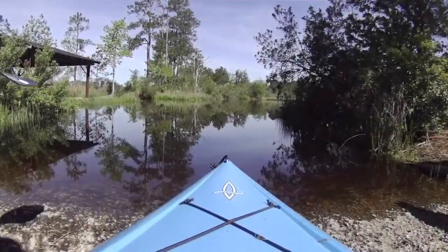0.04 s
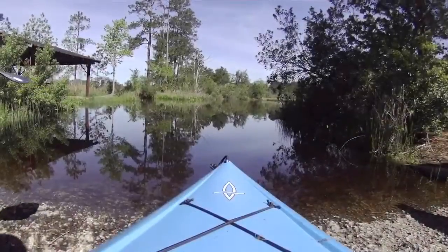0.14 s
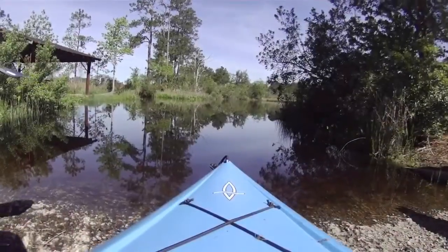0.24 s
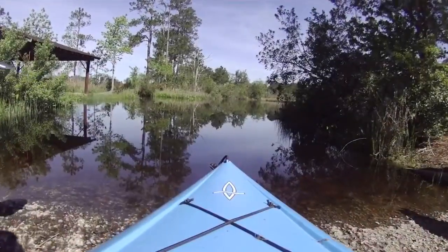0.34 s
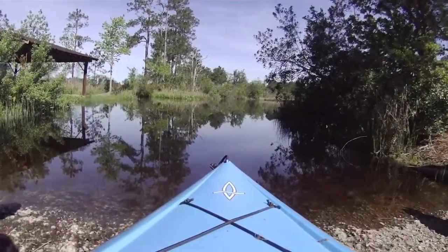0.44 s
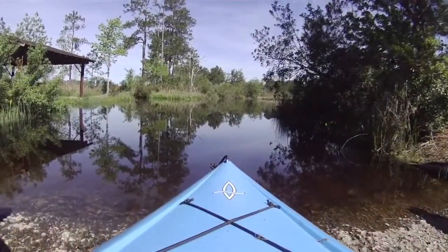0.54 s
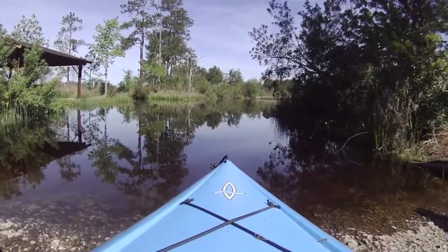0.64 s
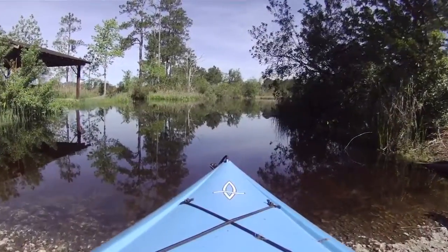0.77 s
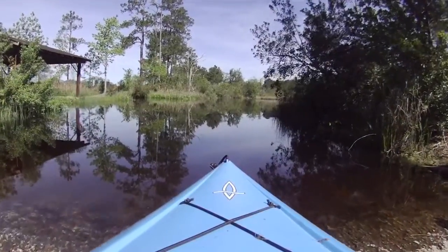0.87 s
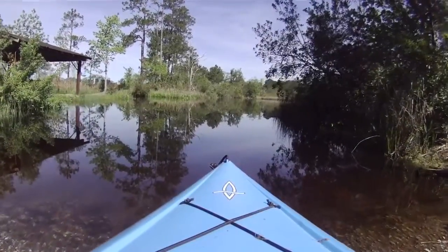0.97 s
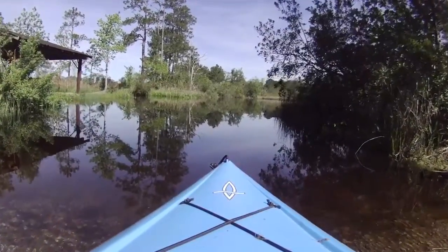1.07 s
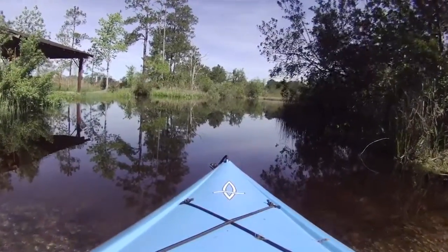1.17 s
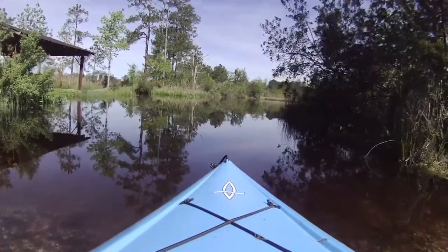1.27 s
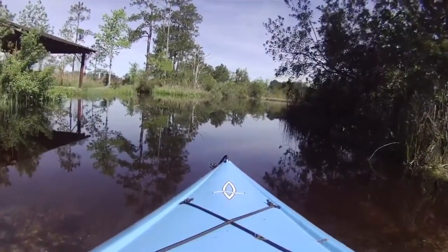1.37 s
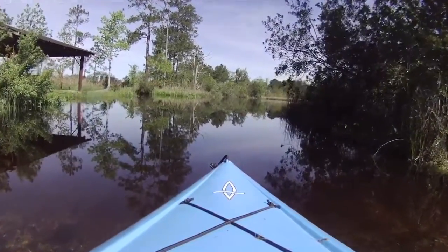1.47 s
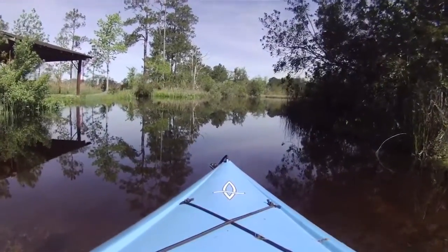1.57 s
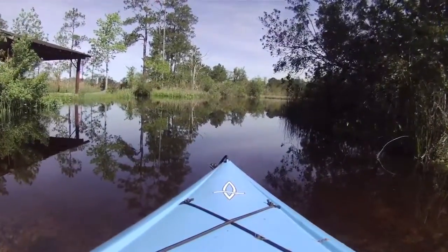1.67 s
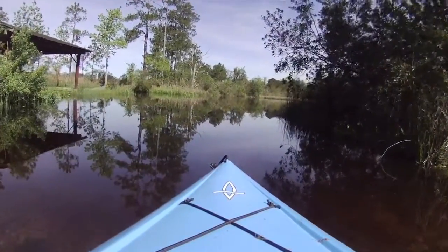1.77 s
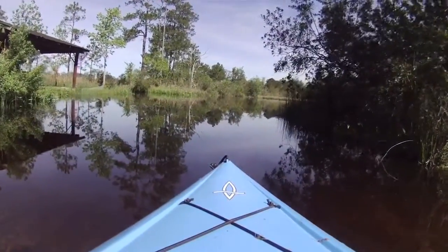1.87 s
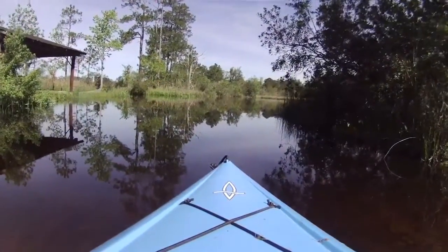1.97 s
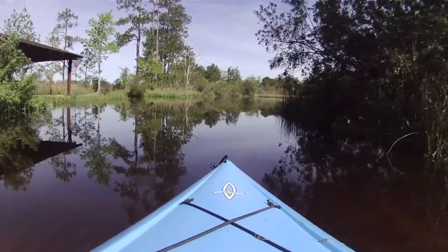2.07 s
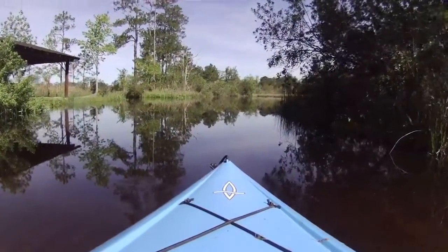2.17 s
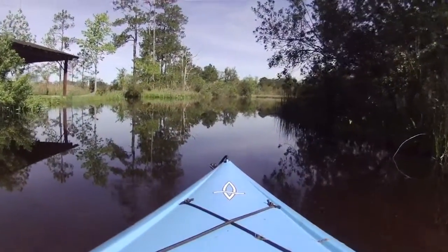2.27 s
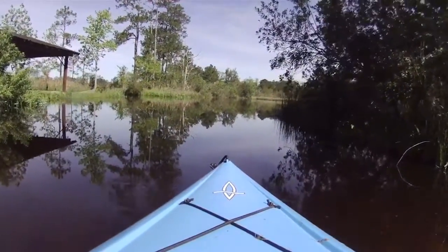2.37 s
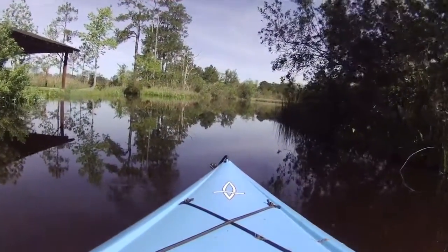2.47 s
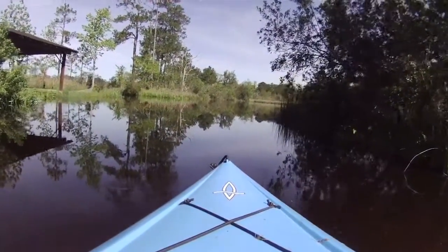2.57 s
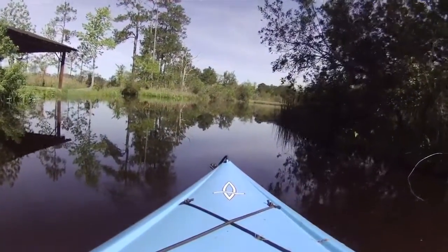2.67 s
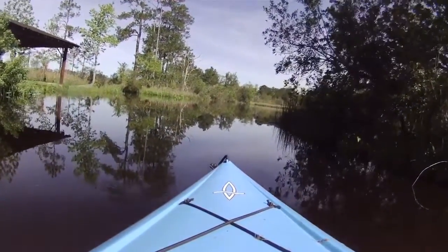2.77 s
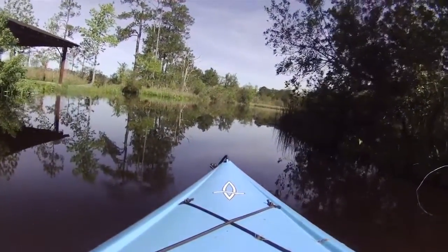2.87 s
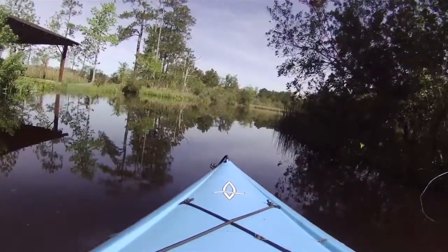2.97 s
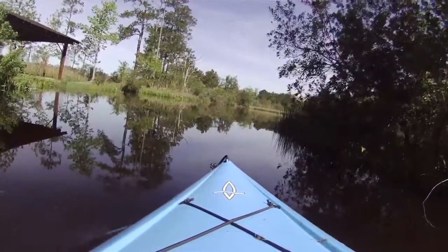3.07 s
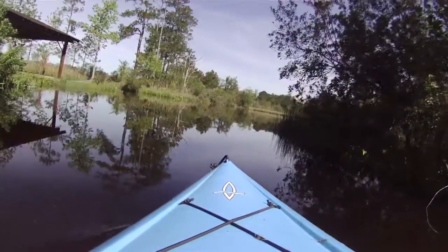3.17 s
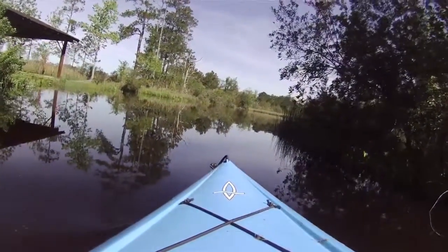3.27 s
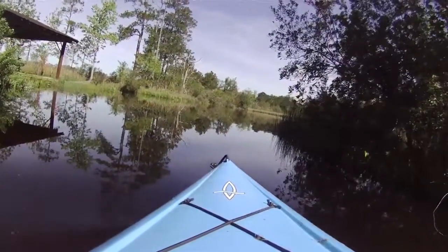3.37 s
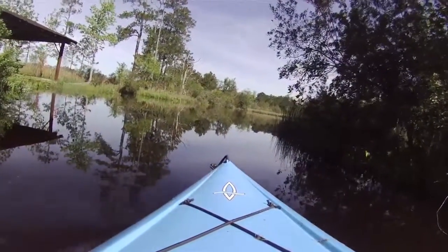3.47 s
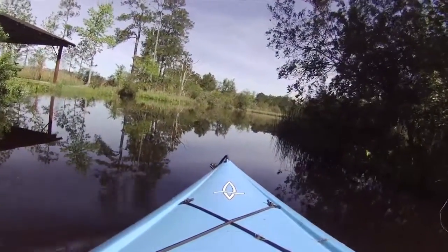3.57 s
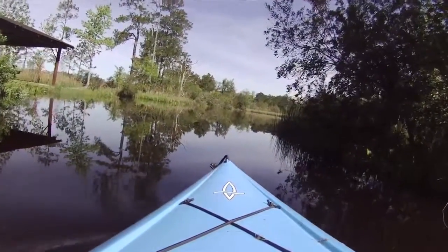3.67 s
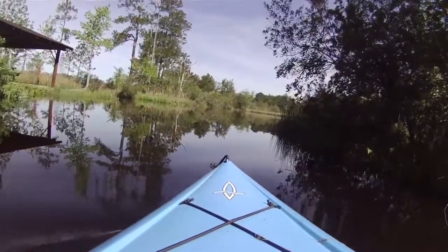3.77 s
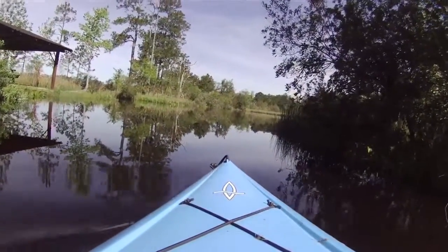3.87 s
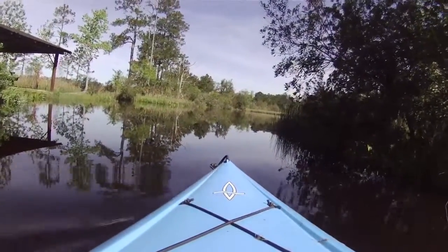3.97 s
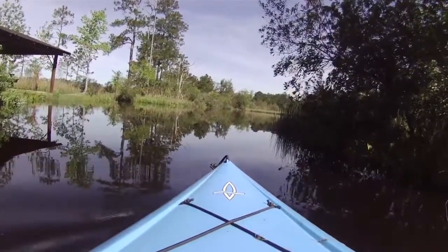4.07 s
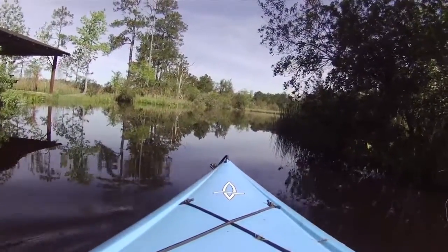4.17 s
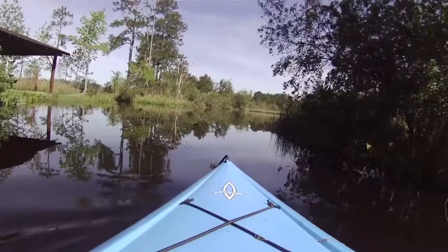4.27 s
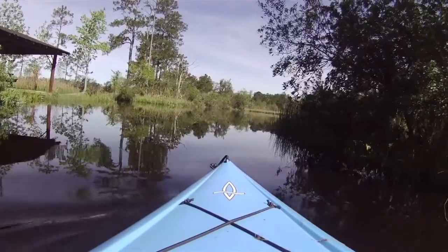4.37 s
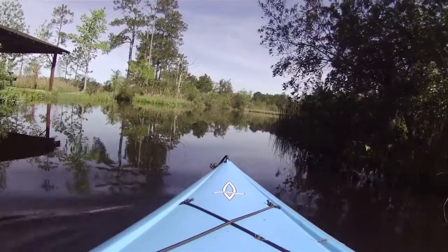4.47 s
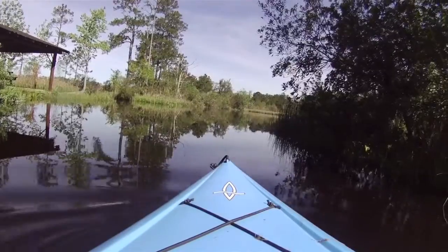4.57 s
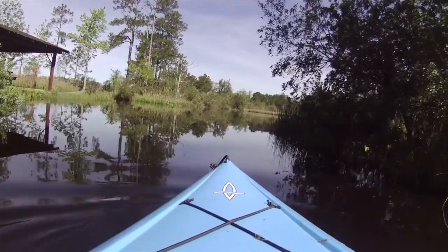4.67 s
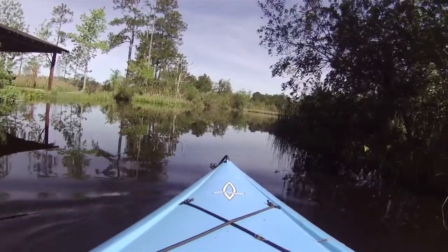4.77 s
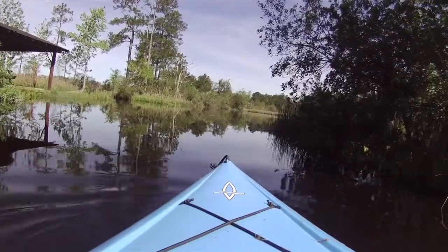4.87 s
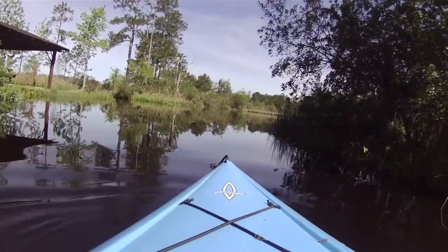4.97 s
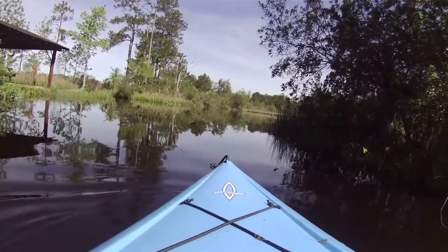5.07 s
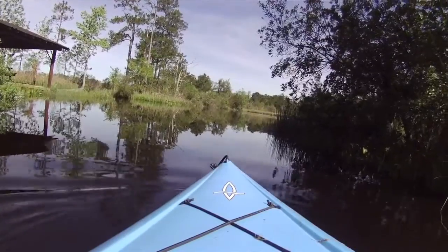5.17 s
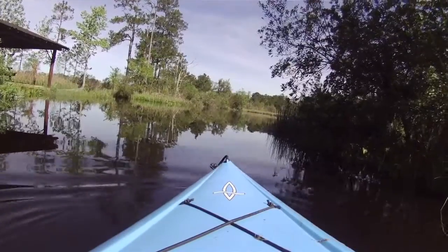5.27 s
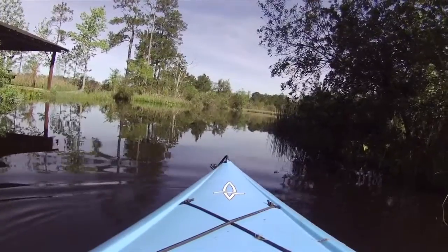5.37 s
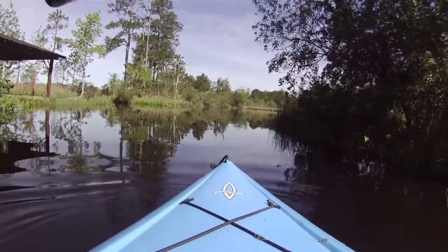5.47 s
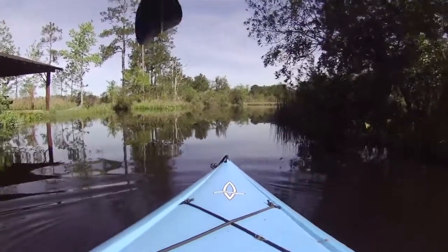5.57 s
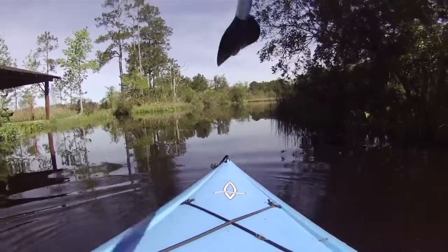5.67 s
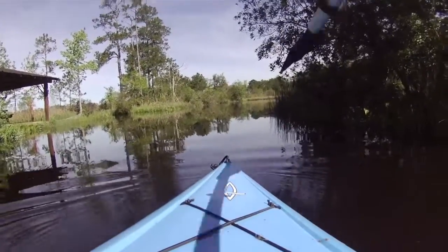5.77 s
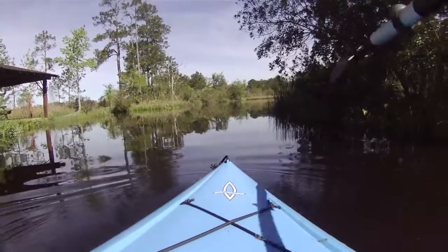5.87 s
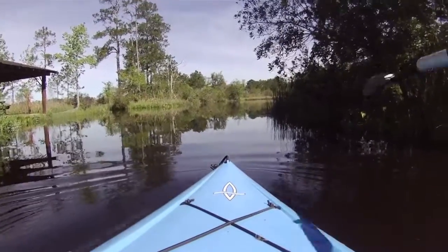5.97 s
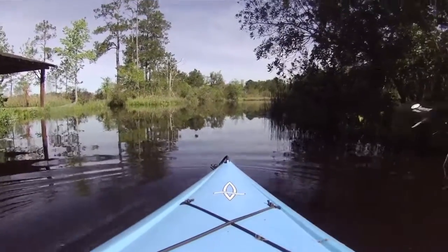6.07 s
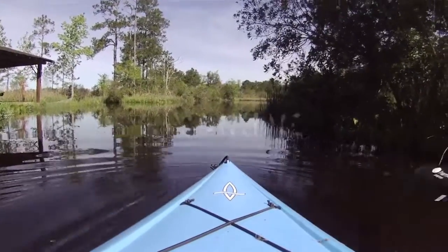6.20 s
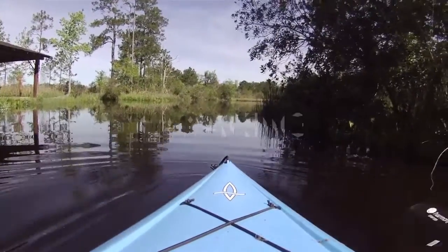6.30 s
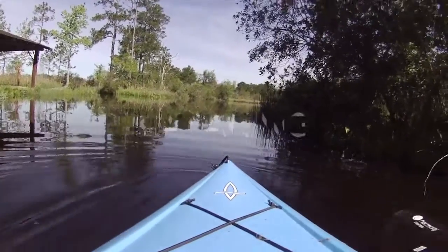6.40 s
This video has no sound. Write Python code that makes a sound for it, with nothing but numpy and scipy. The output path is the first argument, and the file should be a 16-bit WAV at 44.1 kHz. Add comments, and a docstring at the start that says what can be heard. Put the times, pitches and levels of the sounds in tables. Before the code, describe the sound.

Heard from on board, dry and close: a coarse, resonant grinding of pebbles and sand under a hollow plastic boat, full of irregular woody knocks, lasting about three and a half seconds in two shoves. It fades to quiet lapping as the boat floats free. Light drips and small bubbles follow, then a deep watery gulp, a dull bump, more droplets, a second gulp and a loud closing clack on the hull.

```python
"""A gravel bank on a calm creek: a plastic kayak is pushed off, and paddled once it floats free.
Random slips and grains drive the modes of the hollow hull, which booms, and shaped noise makes the crunch.
Larger stones knock at their own pitch. Afloat, the blades gulp (gliding tones), splash and drip (short
ringing tones with noise), small waves hum in the hull and the paddle shaft knocks on it.
Shaped noise laps and hisses underneath."""
import sys
import numpy as np
from scipy import signal
from scipy.fft import rfft, irfft, next_fast_len
from scipy.io import wavfile
from scipy.ndimage import uniform_filter1d, map_coordinates

SR = 44100
rng = np.random.default_rng(int(sys.argv[2]) if len(sys.argv) > 2 else 0)


def store_pcm(level_fs):
    """Save levels as 16-bit WAV."""
    pcm = np.round(np.clip(level_fs, -1, 1) * 32767).astype(np.int16)
    wavfile.write(sys.argv[1], SR, np.atleast_2d(pcm).T)


N = 284004


def amp(db):
    """Amplitude ratio of a level in dB."""
    return 10 ** (np.asarray(db) / 20)


def unit(x):
    """x at rms 1."""
    return x / np.sqrt(np.mean(x ** 2) + 1e-20)


def peaked(x):
    """x at peak 1."""
    return x / np.max(np.abs(x))


def curves(rows):
    """One value per sample for each column after the time."""
    s, *cols = np.transpose(rows)
    return [np.interp(np.arange(N) / SR, s, c) for c in cols]


def swells(rows):
    """Bell-shaped lifts from (centre s, length s, dB, ..) rows: one curve for each dB column."""
    t = np.arange(N) / SR
    return sum(np.outer(lifts, np.exp(-2 * ((t - s) / length) ** 2)) for s, length, *lifts in rows)


def envelope(t, rise_s, t60_s, hold_s=0):
    """A straight rise, a hold and an exponential release."""
    return np.clip(t / rise_s, 0, 1) * amp(-60 * np.maximum(t - rise_s - hold_s, 0) / t60_s)


def add(track, s, sound):
    """Mix a sound into the track at time s."""
    start = round(s * SR)
    track[start:start + len(sound)] += sound[:N - start]


def filtered(x, response):
    """x times a complex response of frequency."""
    m = next_fast_len(len(x) + SR // 4)
    return irfft(rfft(x, m) * response(np.fft.rfftfreq(m, 1 / SR)), m)[:len(x)]


def coloured(x, points):
    """x shaped by (Hz, dB) points on a log axis, at rms 1."""
    f, db = np.transpose(points)
    return unit(filtered(x, lambda hz: amp(np.interp(np.log(hz + 1), np.log(f), db))))


def steadied(x, window_s):
    """x with its running rms held at 1."""
    return x / np.sqrt(np.abs(uniform_filter1d(x ** 2, round(window_s * SR))) + 1e-12)


def wobble(knots_per_s):
    """A smooth random curve through normally distributed knots."""
    knots = rng.standard_normal(int(N * knots_per_s / SR) + 4)
    return map_coordinates(knots, [np.arange(N) * knots_per_s / SR])


def contacts(per_s, spread_db):
    """Tiny impacts at random times, with randomly spread sizes and random signs."""
    chance, size, sign = rng.random(N), rng.standard_normal(N), rng.choice([-1, 1], N)
    return (chance < per_s / SR) * sign * amp(spread_db * np.minimum(size, 2))


def scattered(x, t60_s, echo_db):
    """x with a short wash of echoes from inside the hull."""
    t = np.arange(SR // 10) / SR
    tail = rng.standard_normal(len(t)) * amp(-60 * t / t60_s)
    return x + amp(echo_db) * signal.fftconvolve(x, tail / np.linalg.norm(tail))[:len(x)]


# Spectrum of the lapping. Each row: frequency in Hz, level in dB.
LAP_SPECTRUM = [(25, -28), (70, 2.5), (130, -8.5), (185, 1), (260, -1), (400, -5), (680, -4), (1100, -16),
                (2500, -25.5), (6000, -35), (15000, -50)]
# Spectrum of the hiss. Each row: frequency in Hz, level in dB.
HISS_SPECTRUM = [(300, 11.5), (2000, 1), (5000, -5.5), (8000, -8.5), (15000, -9)]
# Water moving along the floating hull. Each row: time in seconds, level afloat in dB.
LAPPING_LEVELS = [(4.25, -65), (4.6, -57.5), (5.5, -61), (5.68, -61), (5.78, -53), (6.39, -51)]
# Spells of faint hiss. Each row: start in seconds, hold in seconds, level in dB.
FAINT_HISS_SPELLS = [(4.4, 0.69, -65), (5.714, 0.15, -67.5)]
HISS_AFLOAT_DB, HISS_RISE_S, HISS_T60_S = -68, 0.22, 0.42


def creek():
    """Shaped noise: water laps at the hull, fuller once afloat, over a faint hiss that comes and goes."""
    t = np.arange(N) / SR
    aground = 1 - np.clip(t / KEEL_LOAD[-1][0], 0, 1)
    ripples = amp(1.5 * wobble(22))
    lap = steadied(coloured(rng.standard_normal(N), LAP_SPECTRUM), window_s=0.17)
    lap = lap * ripples * amp(curves(LAPPING_LEVELS)[0] - 12.0 * aground)
    spells = sum(amp(db) * envelope(t - s, HISS_RISE_S, HISS_T60_S, hold_s)
                 for s, hold_s, db in FAINT_HISS_SPELLS)
    hiss_level = np.hypot(amp(HISS_AFLOAT_DB - 7.6 * aground), spells)
    return lap + hiss_level * coloured(rng.standard_normal(N), HISS_SPECTRUM)


# Modes of the hull, lowest first. Each row: frequency in Hz, width in Hz, relative gain in dB.
HULL_MODES = [(67.4, 9, -23), (190.2, 20, 6), (406, 52.3, -1), (491, 37, -2), (569.7, 33, 3.5),
              (691, 66, -1.5), (824, 65, -10), (1050, 60, -29)]


def hull(force, modes=None):
    """The hull's ringing answer to a force; above its resonance each mode falls away steeply."""
    modes = HULL_MODES if modes is None else modes

    def response(f):
        ring = sum((-1) ** k * amp(db) * w * c / (c * c - f * f + 1j * f * w)
                   for k, (c, w, db) in enumerate(modes))
        return ring * (1j * f / (1j * f + 58)) ** 3  # low cut at 58 Hz
    return filtered(force, response)


WAVER_S, WAVER_KNOTS_PER_S = .002, 22


def wavering(x):
    """The pitch of a panel wavers as the load on it shifts: a randomly varying delay."""
    shift = SR * WAVER_S * wobble(WAVER_KNOTS_PER_S)
    return map_coordinates(x, [np.arange(N) + shift], mode="nearest")


SHIFT_DB, SHIFT_KNOTS_PER_S = 1.3, 32


def shifting(x):
    """Stones of ever new sizes take over: each half-octave band swells and fades on its own."""
    def band(k):
        def response(hz):
            octave = np.log2(np.clip(hz, 700, 11200) / 700)
            return np.maximum(1 - np.abs(2 * octave - k), 0)
        return filtered(x, response)
    return sum(band(k) * amp(SHIFT_DB * wobble(SHIFT_KNOTS_PER_S)) for k in range(9))


def sticking():
    """The hull's grinding dips for an instant before each caught stone lets go."""
    t = np.arange(N) / SR
    stall = sum(np.exp(-((t - s + .004) / .009) ** 2) for s, db, hz in CAUGHT_STONES)
    return amp(-4 * stall)


# How hard the keel bears on the gravel over two shoves. Each row: time in seconds, grinding in dB.
KEEL_LOAD = [(0.13, -86), (0.28, -34), (0.85, -27), (1.35, -23), (1.95, -29), (2.64, -28.5), (2.68, -37.5),
             (2.745, -39), (2.778, -21), (2.87, -26.5), (2.96, -35), (3.04, -29), (3.38, -29.5),
             (3.56, -41), (3.66, -38.5), (4.02, -48), (4.25, -70.5)]
# Ridges of gravel that the keel ploughs through.
# Each row: centre in seconds, length in seconds, lift of the grinding in dB, lift of the crunch in dB.
GRAVEL_RIDGES = [(0.56, 0.28, 1.5, 7), (0.79, 0.11, 2, 7.5), (0.935, 0.076, 1.5, 5), (1.13, 0.034, 1, 5),
                 (1.35, 0.2, 0, 1.5), (1.59, 0.052, -1, -6), (1.75, 0.082, 2.5, 4.5), (2.08, 0.014, 3, 1.5),
                 (2.222, 0.04, 3.5, 8.5), (2.29, 0.076, 3.5, 6), (2.51, 0.033, 8.5, 7.5),
                 (3.712, 0.02, 3.5, 16.5)]
# The bottom flexes over humps and off the edge of the bank.
# Each row: centre in seconds, length in seconds, lift of the lowest mode in dB, lift of the whole boom in dB.
BOTTOM_FLEXES = [(0.68, 0.046, 23.5, 9), (1.06, 0.023, 5, 4), (1.15, 0.086, 29.5, 4), (1.41, 0.017, 6, 3),
                 (1.73, 0.039, 21, 10), (2.36, 0.02, 2, 6), (2.55, 0.13, -10, 4), (2.78, 0.82, -2.5, 5),
                 (3.45, 0.4, 28.5, 4)]
# Patches of coarse sand. Each row: centre in seconds, length in seconds, lift in dB.
COARSE_PATCHES = [(0.5, 0.048, 8), (1.02, 0.34, 7), (1.95, 0.032, 9), (2.62, 0.026, 5), (3.19, 0.052, 2)]
# The hull tips into the creek. Each row: time in seconds, share of the keel's contact that is under water.
SUNK_SHARE = [(2.0, 0.01), (3.41, 0.31), (3.47, 1)]
# Spectrum of pebbles on dry ground. Each row: frequency in Hz, level in dB.
PEBBLE_SPECTRUM = [(300, -23), (600, 2.5), (950, 12), (1370, -1), (2000, -4.5), (2800, -13.5),
                   (4500, -34.5), (9000, -71.5)]
# Spectrum of pebbles under water. Each row: frequency in Hz, level in dB.
SUNK_SPECTRUM = [(300, -30), (700, 11.5), (1050, 4.5), (1400, -1), (2000, -10), (2600, -17.5), (3500, -33),
                 (9000, -57.5)]
# Spectrum of sand. Each row: frequency in Hz, level in dB.
SAND_SPECTRUM = [(1000, -54.5), (1900, -9.5), (3000, -1), (4200, -5), (6800, -15.5), (7600, -22),
                 (11000, -27), (15000, -41)]
# How boom, pebbles and sand follow the load.
# Each holds: level in a steady slide in dB, dB per dB of load, change under water in dB.
BOOM_FOLLOW = (-37.5, 0.46, 1.4)
PEBBLE_FOLLOW = (-41.5, 1.0, -1.5)
SAND_FOLLOW = (-56.5, 0.87, -31)
FIRM_DB = -25.5  # load of a steady slide
RUMBLE_DB = 1.5  # gain of the lowest mode beside the air space
DRY_PANEL_DB, WET_PANEL_LIFT_DB = -1.5, 6.5  # gain of the lowest panel mode, and its lift under water
START_DULL_DB, START_SOFT_DB, START_S = -24, -7.5, 0.58  # sand and pebbles build up as the boat gathers speed
ROLL_S, ROLL_FADE_S = 0.24, 0.17  # loose stones roll only after the hull has begun to slide
AFLOAT_S, AFLOAT_FADE_S, AFLOAT_DB = 3.78, 0.15, -9.5  # water takes the weight and the boom weakens
STERN_S, STERN_HOLD_S, STERN_DB = 3.62, 0.31, -49  # the stern rubs over the last sunken pebbles
STERN_RISE_S, STERN_T60_S = 0.027, 0.5
CRUNCH_UNEVEN_DB = 0.7


def gravel():
    """Stones slip along the keel in clumps, drive the air space and panels, and crunch on each other."""
    t = np.arange(N) / SR
    keel_db, = curves(KEEL_LOAD)
    ridge_db, crunch_db = swells(GRAVEL_RIDGES)
    flex_db, air_db = swells(BOTTOM_FLEXES)
    patch_db, = swells(COARSE_PATCHES)
    sunk = np.clip(curves(SUNK_SHARE)[0], 0, 1)

    def follow(law, load_db):
        steady_db, slope, wet_db = law
        return steady_db + slope * (load_db - FIRM_DB) + wet_db * sunk

    start_s, end_s = KEEL_LOAD[0][0], KEEL_LOAD[-1][0]
    slow = np.exp(-np.maximum(t - start_s, 0) / START_S)
    afloat = np.clip((t - AFLOAT_S) / AFLOAT_FADE_S, 0, 1)
    grind_db = keel_db + ridge_db
    boom_db = follow(BOOM_FOLLOW, grind_db) + air_db + AFLOAT_DB * afloat
    pebble_db = follow(PEBBLE_FOLLOW, keel_db + crunch_db) + START_SOFT_DB * slow
    sand_db = follow(SAND_FOLLOW, keel_db + crunch_db) + patch_db + START_DULL_DB * slow
    aground = np.clip((t - start_s) / 0.045, 0, 1) * np.clip((end_s - t) / 0.086, 0, 1)

    clumps = amp(1.15 * wobble(110))
    slips = unit(contacts(per_s=1300, spread_db=4.5) * clumps)
    grains = unit(contacts(per_s=16000, spread_db=2.5) * np.sqrt(clumps))

    # the point of contact travels along the keel, so the modes take turns in being driven hardest
    ringing = [hull(slips, [mode]) * (-1) ** k * amp(1.8 * wobble(14))
               for k, mode in enumerate(HULL_MODES)]
    boom = amp(RUMBLE_DB + flex_db) * ringing[0] + wavering(ringing[1])
    boom = steadied(boom, window_s=0.1) * amp(boom_db)
    panels = amp(DRY_PANEL_DB + WET_PANEL_LIFT_DB * sunk) * ringing[2] + sum(map(wavering, ringing[3:]))
    panels = steadied(panels, window_s=0.018) * amp(grind_db)

    crunch = scattered(shifting(slips + 3 * grains), t60_s=0.03, echo_db=-9)
    stern = amp(STERN_DB) * envelope(t - STERN_S, STERN_RISE_S, STERN_T60_S, STERN_HOLD_S)
    pebbles = (1 - sunk) * coloured(crunch, PEBBLE_SPECTRUM) + sunk * coloured(crunch, SUNK_SPECTRUM)
    pebbles = steadied(pebbles, window_s=0.016) * np.hypot(amp(pebble_db), stern)
    grit = scattered(shifting(grains + .4 * slips), t60_s=0.03, echo_db=-9)
    sand = steadied(coloured(grit, SAND_SPECTRUM), window_s=0.21) * amp(sand_db)

    rolling = np.clip((t - ROLL_S) / ROLL_FADE_S, 0, 1)
    loose = rolling * amp(CRUNCH_UNEVEN_DB * wobble(34.73)) * (pebbles + sand)
    return aground * (sticking() * (boom + panels) + loose)


# Large stones that catch under the keel.
# Each row: start in seconds, level in dB before STONE_TRIM_DB, pitch of the knock in Hz.
CAUGHT_STONES = [(0.175, -42, 420), (0.537, -18, 630), (0.739, -13, 646), (0.75, -15, 627),
                 (0.779, -20, 570), (0.821, -9, 682), (0.831, -15.5, 698), (0.868, -14.5, 565),
                 (0.904, -16.5, 590), (0.969, -12.5, 490), (0.996, -17, 700), (1.098, -13.5, 607),
                 (1.132, -18, 626), (1.192, -14, 714), (1.239, -15, 600), (1.278, -20, 402),
                 (1.324, -12.5, 704), (1.377, -13.5, 413), (1.426, -14.5, 548), (1.468, -14, 425),
                 (1.525, -12.5, 420), (1.553, -9, 493), (1.71, -10, 455), (1.786, -16, 480),
                 (1.829, -11, 496), (1.969, -12, 557), (2.033, -13.5, 492), (2.063, -16, 563),
                 (2.212, -11.5, 507), (2.3, -15.5, 792), (2.322, -15, 864), (2.495, -14.5, 402),
                 (2.523, -15, 403), (2.772, -12, 400), (2.871, -17.5, 555), (3.116, -18.5, 448)]
STONE_TRIM_DB, STONE_RISE_S, STONE_T60_S = -3, .0028, .035
STONE_HULL_DB = -5  # whole hull re the struck patch
STONE_LOW_HZ = 228  # a stone is too small to drive the hull well below this


def stones():
    """A stone snaps free: the patch of hull above it knocks at its own pitch, and the rest answers."""
    out, t = np.zeros(N), np.arange(SR // 8) / SR
    force = filtered(np.exp(-t / .00006), lambda f: (1j * f / (1j * f + STONE_LOW_HZ)) ** 2)
    ring = hull(force, HULL_MODES[2:])
    for s, db, hz in CAUGHT_STONES:
        patch = np.sin(2 * np.pi * hz * t) * envelope(t, STONE_RISE_S, STONE_T60_S)
        answer = peaked(scattered(ring, t60_s=0.045, echo_db=0))
        crunch = peaked(coloured(rng.standard_normal(len(t)), PEBBLE_SPECTRUM)) * amp(-60 * t / 0.02)
        knock = peaked(patch + amp(STONE_HULL_DB) * answer)
        add(out, s, amp(db + STONE_TRIM_DB) * (knock + amp(-16.5) * crunch))
    return out


# Blades breaking the surface. Each row: start in seconds, level in dB, rise in seconds, t60 in seconds.
BLADE_SPLASHES = [(4.225, -66.5, 0.014, 0.63), (4.435, -46, 0.046, 0.21), (4.98, -57, 0.041, 0.24),
                  (5.292, -47, 0.0085, 0.11), (5.414, -55, 0.008, 0.1), (6.223, -50.5, 0.024, 0.073)]
# Spectrum of the patter. Each row: frequency in Hz, level in dB.
SPRAY_SPECTRUM = [(200, -3), (600, 14), (1100, 3), (2800, 4.5), (5000, -10), (8000, -17), (15000, -51)]


def splashes():
    """A blade throws up a brief spray: single droplets ring over a fine patter of shaped impacts."""
    flow, droplets, t = np.zeros(N), np.zeros(N), np.arange(SR // 2) / SR
    for s, db, rise_s, t60_s in BLADE_SPLASHES:
        add(flow, s, envelope(t, rise_s, t60_s) * amp(db))
    t = t[:SR // 50]
    for when, pitch, size in rng.random(size=(2200, 3)):
        cycles = 650 * 7 ** pitch * t  # 650 to 4550 Hz
        ring = np.sin(2 * np.pi * cycles) * cycles * np.exp(-cycles / 2)
        add(droplets, when * (N - 1) / SR, amp(-18 * size - 5 * pitch) * ring)
    patter = coloured(contacts(per_s=4000, spread_db=4), SPRAY_SPECTRUM)
    return flow * unit(unit(droplets) + 1.6 * patter)


def bubble(hz, t60_s):
    """A bubble rings with a pitch that rises from hz."""
    t = np.arange(SR // 16) / SR
    return np.sin(2 * np.pi * hz * t * (1 + 4 * t)) * envelope(t, 1 / hz, t60_s)


DRIP_T60_S = .033


def drip(db, hz):
    """A drop ticks on the surface (shaped noise) and leaves a small bubble."""
    t = np.arange(SR // 16) / SR
    spectrum = [(hz / 4, -20), (hz, 0), (2 * hz, -8), (4 * hz, -32)]
    tick = coloured(rng.standard_normal(len(t)), spectrum) * envelope(t, 0.0012, DRIP_T60_S)
    return amp(db) * (0.35 * bubble(hz, DRIP_T60_S) + 0.7 * peaked(tick))


# Big drops from the blades. Each row: start in seconds, level in dB, starting pitch in Hz.
BIG_DRIPS = [(4.2631, -47, 2940), (4.3005, -45, 2910), (4.3289, -46, 2900), (4.3798, -48, 2200),
             (4.4277, -41, 1700), (4.516, -39, 2250), (4.74, -37, 2660), (4.9844, -41, 2400),
             (5.0018, -38, 4500), (5.0343, -41, 2800), (5.4152, -44, 2850), (5.5187, -48, 3090),
             (5.603, -48, 1760), (6.0221, -44, 1850), (6.0405, -38, 2600), (6.1498, -38, 1930)]
# A raised blade trickles. Each row: start in seconds, length in seconds, level of the largest drops in dB.
BLADE_TRICKLES = [(4.225, .32, -49), (5.36, .94, -48)]
TRICKLE_MID_HZ, TRICKLE_OCTAVES, TRICKLE_SPREAD_DB, DROPS_PER_S = 2630, 1, 22, 28


def drips():
    """Big drops fall from the blades, and a fine trickle of random drops runs off while one is raised."""
    out = np.zeros(N)
    for s, db, hz in BIG_DRIPS:
        add(out, s, drip(db, hz))
    for start_s, length_s, db in BLADE_TRICKLES:
        count = round(length_s * DROPS_PER_S)
        for k, (when, size, pitch) in enumerate(rng.random((count, 3))):
            hz = TRICKLE_MID_HZ * 2 ** (TRICKLE_OCTAVES * (pitch - .5))
            add(out, start_s + (k + when) / DROPS_PER_S, drip(db - TRICKLE_SPREAD_DB * size, hz))
    return out


# Bubbles in the eddies. Each row: start in seconds, level in dB, starting pitch in Hz.
EDDY_BLIPS = [(4.402, -45.5, 575), (4.603, -42.5, 654), (5.494, -42, 456), (5.792, -47, 676),
              (5.872, -48, 845), (5.991, -39, 453), (6.18, -41, 520), (6.276, -32, 640)]
BLIP_T60_S = 0.02


def blips():
    """Larger bubbles ring as they surface in the eddies that the blades leave."""
    out = np.zeros(N)
    for s, db, hz in EDDY_BLIPS:
        add(out, s, amp(db) * bubble(hz, BLIP_T60_S))
    return out


# Air pockets that open behind a blade. Each row: start in seconds, level in dB before a 3 dB cut,
# start pitch in Hz, end pitch in Hz, rise in seconds, t60 in seconds, churn in dB (rms 1 at 0 dB).
AIR_GULPS = [(4.4768, -32.5, 900, 380, .002, .15, 0), (4.984, -39, 680, 600, .004, .08, -5),
             (5.0, -43, 480, 430, .006, .25, 1), (5.03, -42, 800, 680, .007, .11, -2),
             (5.097, -26, 420, 310, .006, .055, -10), (5.119, -32, 400, 350, .005, .11, -9),
             (5.2972, -10.5, 780, 330, .008, .06, -10), (5.319, -16.5, 510, 420, .005, .06, -13),
             (5.42, -38, 720, 620, .003, .06, 1), (5.75, -37, 400, 450, .008, .11, -7),
             (6.228, -38, 640, 540, .016, .25, 3), (6.287, -16, 480, 240, .003, .06, -6)]
# Water churning round a pocket that sings at CHURN_NOTE_HZ. Each row: frequency in Hz, level in dB.
CHURN_SPECTRUM = [(50, -35), (200, 4), (500, -1.5), (720, -1.5), (1050, -22), (3000, -63.5)]
CHURN_NOTE_HZ = 500
GLIDE_S = 0.0117  # time constant of the pitch
SLAP_DB, SLAP_RISE_S, SLAP_T60_S, SLAP_RATIO = -9.5, 0.00085, 0.022, 1.2  # ratio: slap re start pitch


def gulps():
    """An air pocket's note glides as it opens, the churn glides along; a faster opening slaps harder."""
    water, t = np.zeros(N), np.arange(SR // 2) / SR
    for s, db, start_hz, end_hz, rise_s, t60_s, churn_db in AIR_GULPS:
        pitch_hz = end_hz + (start_hz - end_hz) * np.exp(-t / GLIDE_S)
        tremble = 1 + .07 * wobble(300)[:len(t)]
        note = np.sin(2 * np.pi * np.cumsum(pitch_hz * tremble) / SR)
        # reading the noise at a varying speed moves its spectrum with the note
        churn = coloured(rng.standard_normal(len(t)), CHURN_SPECTRUM)
        churn = map_coordinates(churn, [np.cumsum(pitch_hz) / CHURN_NOTE_HZ], mode="wrap")
        churn = steadied(churn, window_s=0.008) * amp(churn_db)
        hz = SLAP_RATIO * start_hz
        spectrum = [(hz / 2, -12), (hz, 0), (1.04 * hz, -13), (3.0 * hz, -21), (12 * hz, -60)]
        slap = coloured(rng.standard_normal(len(t)), spectrum) * envelope(t, SLAP_RISE_S, SLAP_T60_S)
        opening = amp(SLAP_DB) * np.sqrt(SLAP_RISE_S / rise_s) * slap
        add(water, s, amp(db - 3) * (opening + envelope(t, rise_s, t60_s) * (note + churn)))
    return scattered(water, t60_s=0.09, echo_db=-17)


# Small waves that bump the hull. Each row: start in seconds, level in dB.
HULL_WAVELETS = [(4.49, -41), (4.522, -32.5), (5.108, -37), (5.3334, -16.5), (5.424, -42), (5.489, -39.5),
                 (5.616, -41.5), (5.726, -36.5), (5.779, -39.5), (5.816, -45), (6.064, -37), (6.291, -22.5)]
# Spectrum of the slosh. Each row: frequency in Hz, level in dB.
SLOSH_SPECTRUM = [(30, 5), (70, -6), (170, 8), (300, -4.5), (700, -12.5), (2000, -58)]
HUM_HZ, HUM_RISE_S, HUM_T60_S = 180.4, 0.0026, 0.13
SLOSH_DB, SLOSH_T60_S = -24, 0.87  # re the hum's peak


def wavelets():
    """A small wave bumps the hull, makes its air space hum (trembling sine) and sloshes away (noise)."""
    out, t = np.zeros(N), np.arange(SR // 2) / SR
    for s, db in HULL_WAVELETS:
        tremble = 1 + .06 * wobble(300)[:len(t)]
        hum = np.sin(2 * np.pi * np.cumsum(HUM_HZ * tremble) / SR) * envelope(t, HUM_RISE_S, HUM_T60_S)
        wash = coloured(rng.standard_normal(len(t)), SLOSH_SPECTRUM) * envelope(t, HUM_RISE_S, SLOSH_T60_S)
        add(out, s, amp(db) * (hum + amp(SLOSH_DB) * wash))
    return out


# Blows on the hull. Each row: start in seconds, level in dB, corner of the push in Hz,
# shaft click in dB re the body's peak, dent of the deck in dB re its ring.
HULL_KNOCKS = [(5.3044, -20.5, 287, -21, -13), (5.9463, -23, 230, -16, -8), (6.154, -37.5, 298, -8, -25),
               (6.395, -26.5, 85.7, -36, -8), (6.4095, -3, 706, -4, -4), (6.412, -12, 384, -5.5, -5),
               (6.4159, -21, 398, 1.5, 1)]
# Modes of the paddle shaft. Each row: frequency in Hz, relative level in dB, t60 in seconds.
SHAFT_MODES = [(920, 21, 0.011), (1810, 10.5, 0.011), (2390, 0.5, 0.0115), (3890, 7, 0.0013)]


def knocks():
    """Soft bumps mostly boom; a hard blow of the shaft dents the deck, rings the panels and clicks."""
    out, t = np.zeros(N), np.arange(SR // 4) / SR
    for s, db, corner_hz, click_db, dent_db in HULL_KNOCKS:
        u = 2 * np.pi * corner_hz * t
        push = u * u * (1 - u / 3) * np.exp(-u)
        body = peaked(peaked(hull(push)) + amp(dent_db) * peaked(push))
        shaft = sum(amp(level_db - 60 * t / t60_s) * np.sin(2 * np.pi * hz * t)
                    for hz, level_db, t60_s in SHAFT_MODES)
        crack = coloured(rng.standard_normal(len(t)), [(5000, 6.5), (15000, -16.5)])
        crack = 0.84 * crack * amp(-60 * t / 0.02)
        add(out, s, amp(db) * (body + amp(click_db) * peaked(shaft + crack)))
    return out


def scene():
    """All sources, summed to one channel."""
    shore = creek() + gravel() + stones()
    paddling = splashes() + drips() + blips() + gulps() + wavelets() + knocks()
    return (shore + paddling)[None]


TOP_HZ = 15400


def record(dry):
    """Clip at full scale, then remove everything from TOP_HZ up."""
    return np.array([filtered(np.clip(x, -1, 1), lambda hz: hz < TOP_HZ) for x in dry])


dry = scene()
out = record(dry)
store_pcm(out)
```